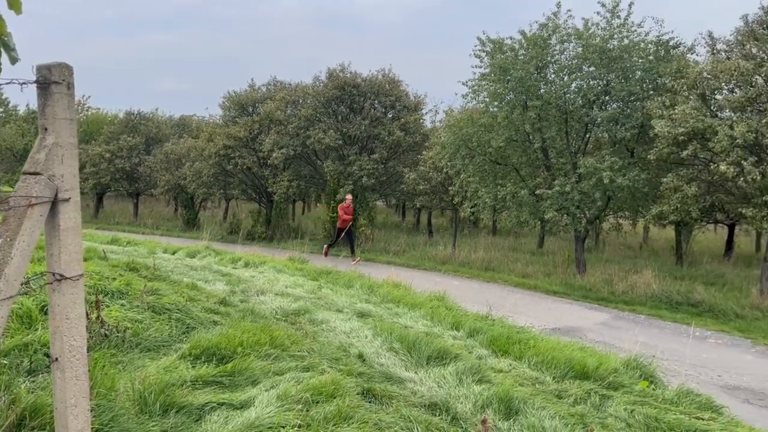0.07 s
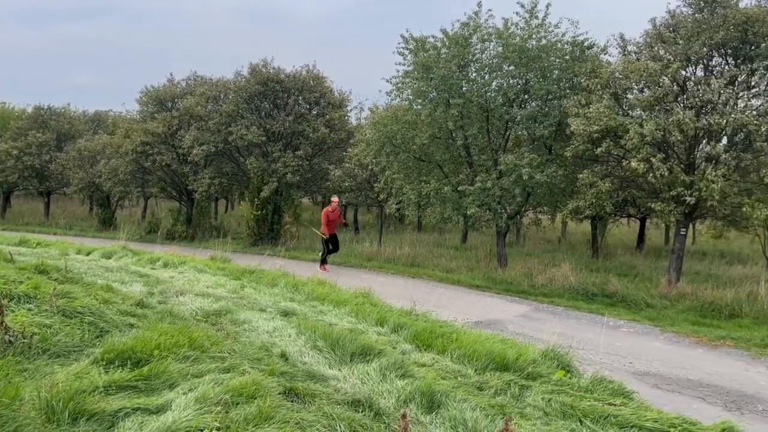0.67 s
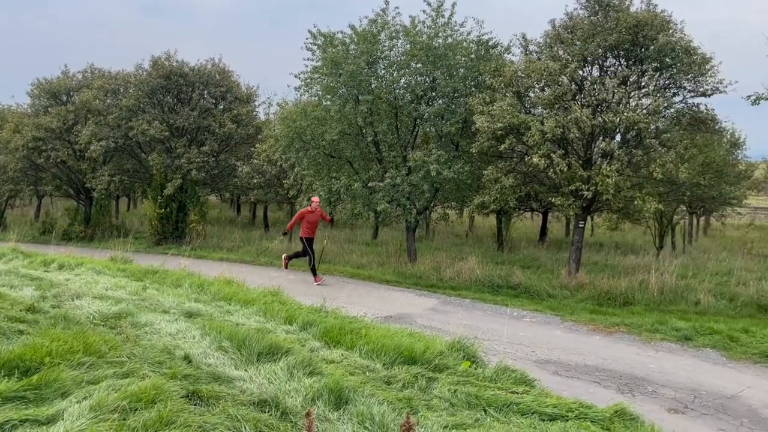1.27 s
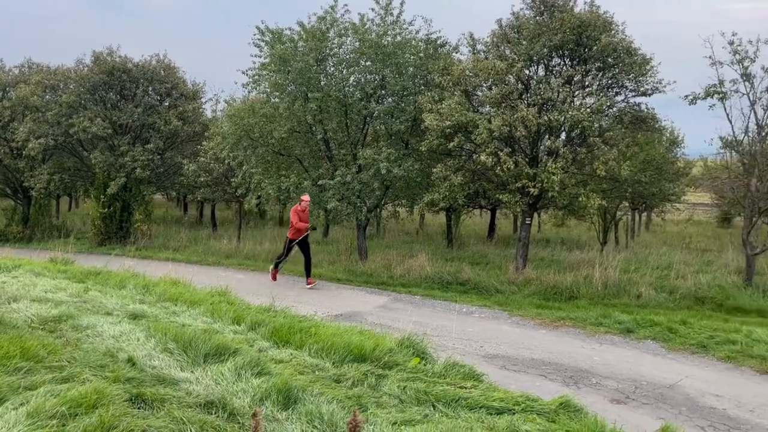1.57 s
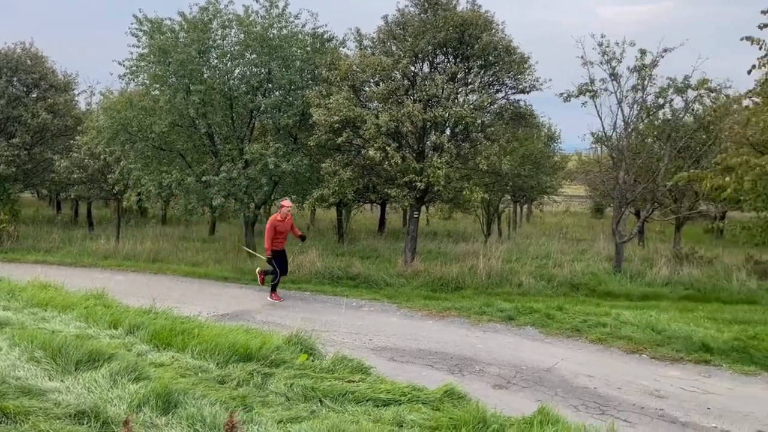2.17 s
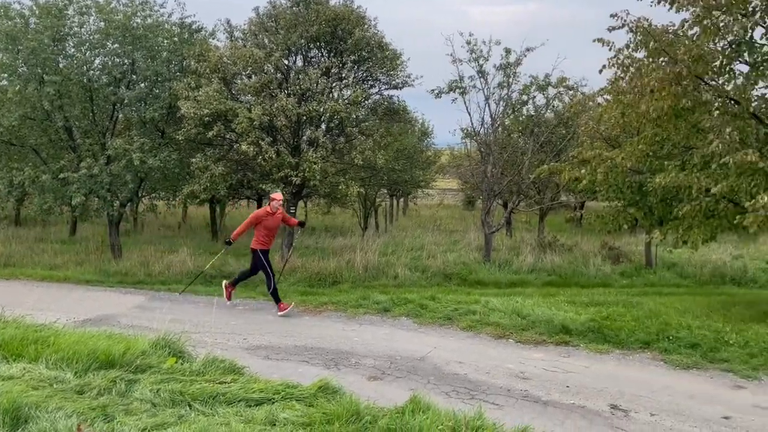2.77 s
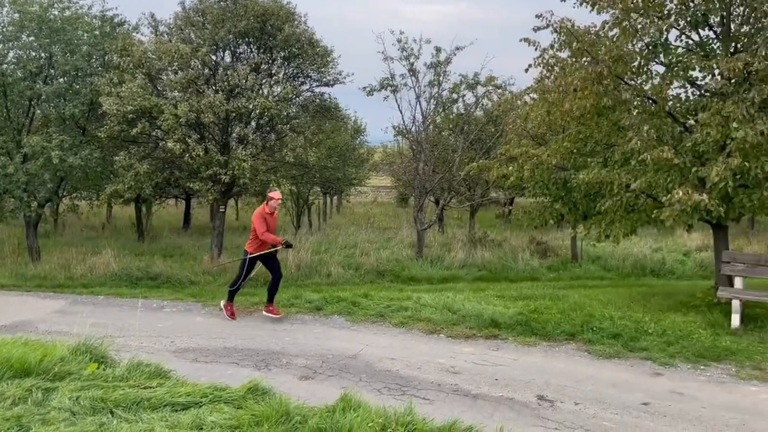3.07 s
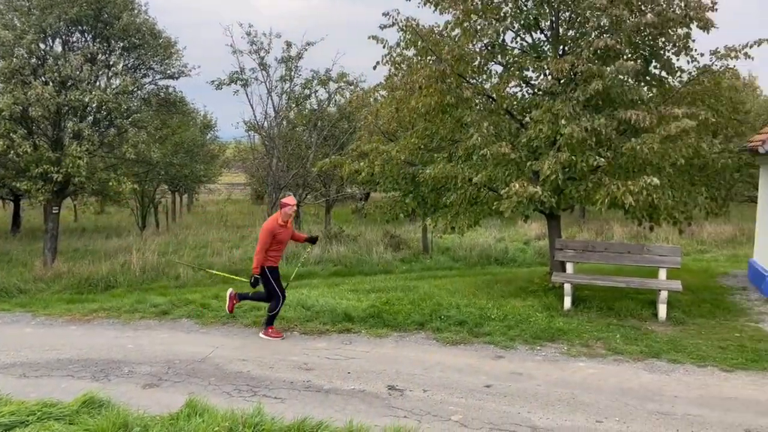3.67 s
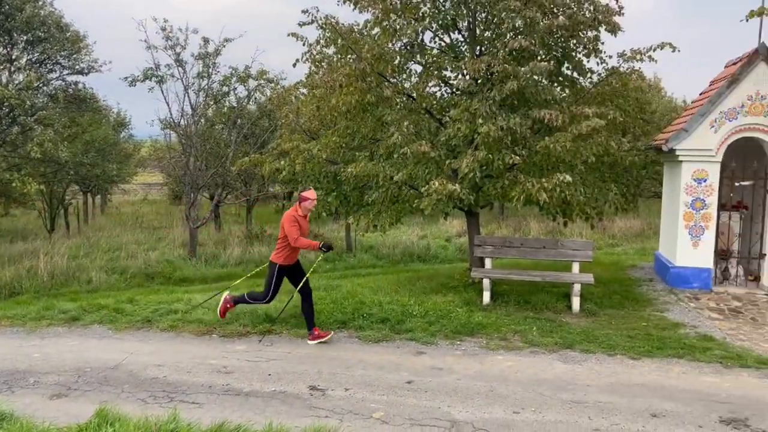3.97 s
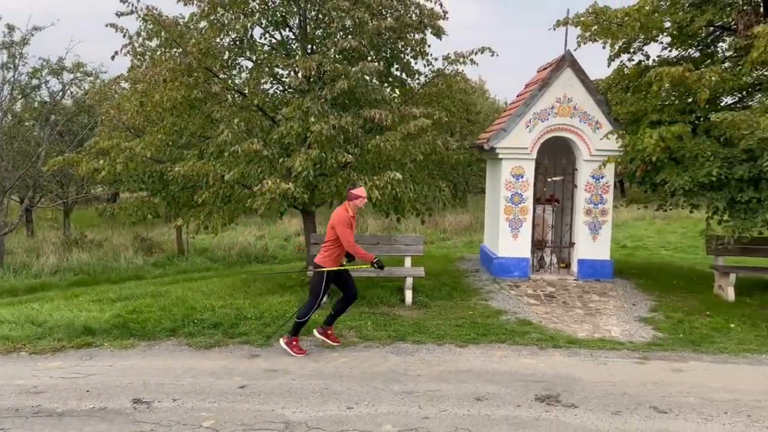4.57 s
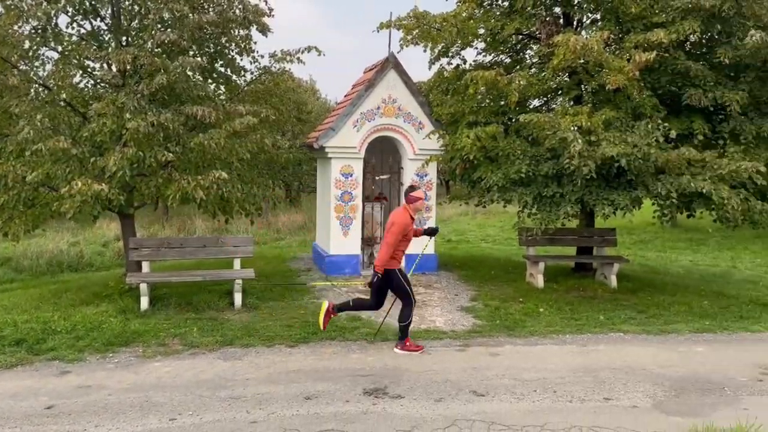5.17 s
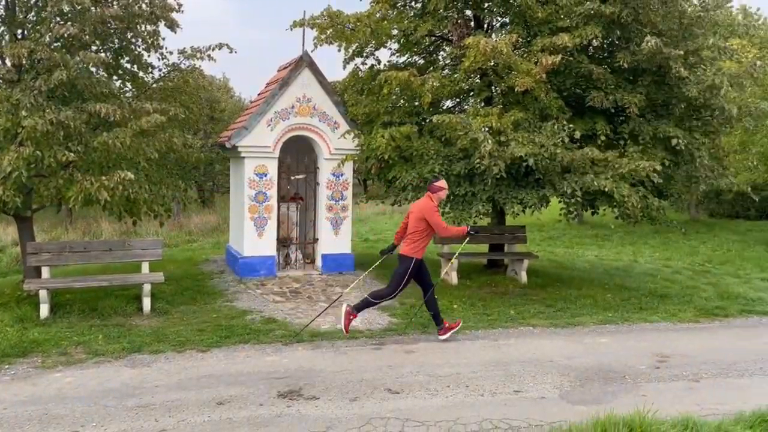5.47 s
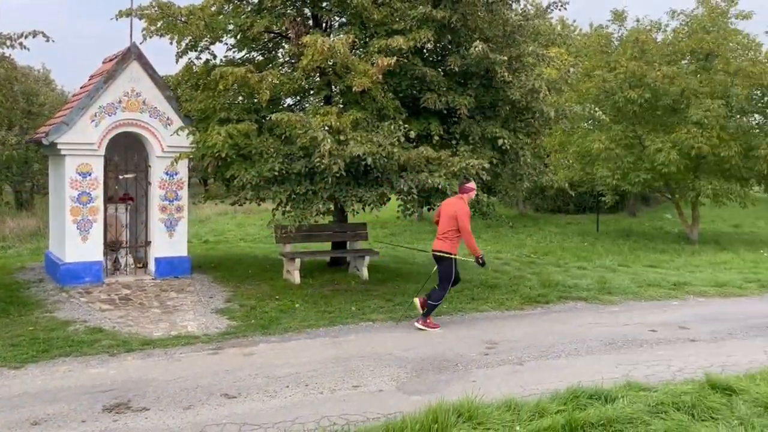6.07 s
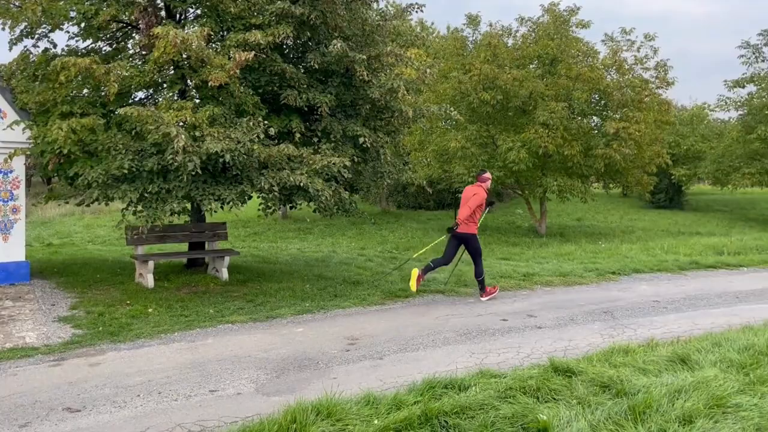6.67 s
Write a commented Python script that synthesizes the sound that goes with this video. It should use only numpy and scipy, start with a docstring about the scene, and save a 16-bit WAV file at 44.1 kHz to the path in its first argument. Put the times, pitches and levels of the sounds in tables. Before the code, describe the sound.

Sharp clacks of walking pole tips and soft, gritty footsteps as a runner approaches and passes on an outdoor path, with light wind.

```python
"""An orchard path of gritty asphalt: a faint far hum, rustling leaves, a little wind on the microphone.
A runner with two metal-tipped poles bounds in from a distance, near the middle of the stereo image.
Each stride is a soft heel, the clack of a pole tip scattered back by the trees, then grit under the shoe.
The runner is closest and the poles loudest at about 4 s. After that the shoes crunch over looser grit,
the clacks weaken and the breeze freshens."""
import sys
import numpy as np
from scipy import signal
from scipy.fft import rfft, irfft, next_fast_len
from scipy.io import wavfile
from scipy.ndimage import uniform_filter1d

SR = 44100
rng = np.random.default_rng(int(sys.argv[2]) if len(sys.argv) > 2 else 0)


def to_wav(sig):
    """Store sig (one row per channel, or 1-D mono) as 16-bit WAV at the path in sys.argv[1].

    Samples outside -1..1 are clipped; the rate is SR.
    """
    pcm = np.clip(np.atleast_2d(sig), -1, 1) * 32767
    pcm = np.round(pcm).astype(np.int16)
    wavfile.write(sys.argv[1], SR, pcm.T)  # frames by channels


N = 305613
HIT_S = .01  # an impact's level is its energy spread over this time


def undb(db):
    """Decibels to gain."""
    return 10 ** (np.asarray(db) / 20)


def level(x, db, seconds):
    """Scale a sound so that its energy, spread over the given time, has this rms level."""
    return x * undb(db) / np.sqrt(np.mean(np.sum(x ** 2, -1)) / (seconds * SR))


def curve(rows, t):
    """The columns of a table at the times t."""
    times, *columns = np.transpose(rows)
    return [np.interp(t, times, column) for column in columns]


def band(x, low_hz, high_hz, order=3):
    """Causal band-pass."""
    return signal.sosfilt(signal.butter(order, [low_hz, high_hz], "band", fs=SR, output="sos"), x)


def colour(x, points):
    """Filter a sound by a curve of (freq_hz, gain_db) points."""
    hz, db = np.transpose(points)
    size = next_fast_len(x.shape[-1])
    freqs = np.maximum(np.fft.rfftfreq(size, 1 / SR), 1)
    gain = undb(np.interp(np.log(freqs), np.log(hz), db))
    return irfft(rfft(x, size) * gain, size)[..., :x.shape[-1]]


def noise(count, width):
    """Stereo noise; width is the size of the side against the middle."""
    mid, side = rng.standard_normal((2, count))
    return np.array([mid + width * side, mid - width * side])


def grains(count, per_s, spread_db, width):
    """Tiny cracks of unequal size at random moments."""
    sizes = undb(spread_db * np.minimum(rng.exponential(size=count), 4))
    return noise(count, width) * sizes * (rng.random(count) < per_s / SR)


def wander(per_s):
    """A smooth random drift around zero."""
    hold = int(SR / per_s)
    held = np.repeat(rng.standard_normal(N // hold + 1), hold)
    return uniform_filter1d(uniform_filter1d(held, hold), hold)[:N]


def add(track, start_s, sound):
    """Mix a sound into a track."""
    i = int(start_s * SR)
    start, end = max(i, 0), min(i + sound.shape[-1], N)
    if end > start:
        track[:, start:end] += sound[..., start - i:end - i]


# The runner's bearing from the microphones: time_s, left_over_right_db, left_lead_samples
BEARING = [(0, -1, 0.66), (2.4, 0.8, 1.23), (4.1, 0.1, 2.69), (4.7, 0, 1.35), (6.9, -2.6, 0.46)]


def place(x, time_s):
    """Place a sound at the runner by small gaps in level and arrival time between the microphones."""
    pan_db, lead = curve(BEARING, time_s)
    sides = np.array([[.5], [-.5]])
    shift = np.exp(2j * np.pi * np.fft.rfftfreq(x.shape[-1]) * lead * sides)
    return irfft(rfft(x) * shift, x.shape[-1]) * undb(pan_db * sides)


# Spectra of the far hum, the leaves and the wind on the microphone: freq_hz, gain_db
HUM_SPECTRUM = [(45, -19.5), (72, -11), (99, 6.5), (112, -8), (140, -10.5), (220, -17), (500, -78.5)]
LEAF_SPECTRUM = [(60, -18), (160, 2.5), (250, -0.5), (450, -5.5), (800, -10.5), (1500, -16.5), (2800, -20),
                 (4600, -26.5), (6000, -29.5), (7400, -33), (11300, -31), (16000, -53.5)]
WIND_SPECTRUM = [(12, -19), (28, -13.5), (48, 7), (70, 5), (110, -16.5), (250, -26), (800, -60)]
# The freshening breeze: time_s, leaf_gain_db, rumble_db
BREEZE = [(0, -1, -73), (.9, -3.5, -76), (3.2, -1.5, -70), (4.3, -.5, -66.5), (5.6, .5, -66.5),
          (6.9, 4.5, -57)]
# The strongest puffs on the microphone: centre_s, rumble_db
PUFFS = [(3.522, -59), (4.173, -47.5), (4.658, -49), (4.945, -56.5), (5.072, -54), (5.206, -53.5),
         (5.975, -49), (6.423, -45), (6.591, -43), (6.793, -45.5)]


def orchard_air(hum_db=-64, waver_db=.5, leaves_db=-73, flutter_db=4, buffet_db=4, puff_s=.044):
    """Wind buffets the microphone over a far low hum and softly stirring leaves."""
    t = np.arange(N) / SR
    breeze_db, rumble_db = curve(BREEZE, t)
    puffs = sum(undb(db) * np.exp(-((t - centre_s) / puff_s) ** 2) for centre_s, db in PUFFS)
    wind = undb(rumble_db + buffet_db * wander(per_s=7.2)) + puffs
    rumble = level(colour(noise(N, width=.092), WIND_SPECTRUM), 0, N / SR) * wind
    hum = level(colour(noise(N, width=.34), HUM_SPECTRUM), hum_db, N / SR)
    hum *= undb(waver_db * wander(per_s=1.8))
    leaves = level(colour(noise(N, width=.39), LEAF_SPECTRUM), leaves_db, N / SR)
    leaves *= undb(breeze_db + flutter_db * wander(per_s=33))
    return rumble + hum + leaves


# Small stones on the path, under a shoe or a tip: start_s, relative_db, pitch_hz
STONE_SNAPS = [(.2022, -41, 1940), (1.5396, -50, 1310), (2.1257, -38, 1980), (3.2432, -40, 2710),
               (3.8545, -60.5, 2800), (4.0138, -43, 2260), (4.0535, -36, 2240), (4.2377, -51, 3150),
               (4.6331, -47, 2027), (4.923, -51, 1600), (4.9414, -41.5, 1480), (4.991, -55, 3540),
               (5.2074, -47, 1980), (5.342, -60, 2000), (5.606, -48, 1720), (5.7448, -46, 1900),
               (5.7502, -45, 1510), (5.788, -43.5, 1380), (5.7972, -44, 1000), (5.9203, -62, 1180),
               (5.953, -39, 1250), (5.9562, -37, 4480), (6.185, -61.5, 2570), (6.522, -60, 1660)]


def stones(rise_s=.000089, ring_s=.0018, crack_s=.0028, pop_db=-1, crack_db=-7):
    """A stone snaps out from under the load: a crack and a few cycles of pitch."""
    out, t = np.zeros((2, N)), np.arange(SR // 20) / SR
    for start_s, db, pitch_hz in STONE_SNAPS:
        pop = np.sin(2 * np.pi * pitch_hz * t) * (1 - np.exp(-t / rise_s)) * np.exp(-t / ring_s)
        crack = band(noise(len(t), width=1) * np.exp(-t / crack_s), 650, 4070)
        snap = level(pop, db + pop_db, HIT_S) + level(crack, db + crack_db, HIT_S)
        add(out, start_s, place(snap, start_s))
    return out


# Strides along the path, with relative levels at the microphone: start_s, heel_db, crunch_db, hiss_db
STRIDES = [(-.196, -62, -80, -76.5), (.178, -59, -68, -75), (0.564, -61.5, -74, -95),
           (.942, -53.5, -75.5, -94), (1.314, -59, -69, -84), (1.691, -58.5, -66, -76),
           (2.09, -55.5, -64, -65), (2.471, -52.5, -72.5, -82), (2.847, -53, -69, -84),
           (3.231, -53, -60, -71.5), (3.597, -53, -59, -71.5), (3.987, -48, -56, -56.5),
           (4.382, -56, -53.5, -73.5), (4.763, -46.5, -58, -66.5), (5.149, -52, -60, -66),
           (5.554, -51.5, -54.5, -57.5), (5.922, -56, -62.5, -77.5), (6.32, -54.5, -55.5, -65.5),
           (6.706, -58.5, -66.5, -84)]
# Spectra of the heel's thump and the sole's slap: freq_hz, gain_db
THUMP_SPECTRUM = [(50, -5), (130, 9), (300, 6), (600, 0), (1000, -16), (2500, -32), (8000, -54)]
SLAP_SPECTRUM = [(300, -13.5), (750, 6), (1300, 1), (2800, -6.5), (3700, -18), (8000, -32.5), (16000, -56)]


def heels(rise_s=.0015, thump_s=.034, slap_s=.0091, roll_s=.02, sole=.57, thump_db=7, slap_db=3.5):
    """A cushioned heel thumps on grit and the sole slaps down just after it."""
    out, t = np.zeros((2, N)), np.arange(SR // 5) / SR
    rise = 1 - np.exp(-t / rise_s)
    contact = rise * np.exp(-t / slap_s) + sole * (t > roll_s) * np.exp(-abs(t - roll_s) / slap_s)
    for start_s, heel_db, _, _ in STRIDES:
        thump = colour(noise(len(t), width=.31), THUMP_SPECTRUM) * rise * np.exp(-t / thump_s)
        slap = colour(grains(len(t), per_s=3000, spread_db=3.2, width=.35), SLAP_SPECTRUM) * contact
        step = level(thump, heel_db + thump_db, HIT_S) + level(slap, heel_db + slap_db, HIT_S)
        add(out, start_s, place(step, start_s))
    return out


# Loose grit on the path under the runner: time_s, loose_fraction
LOOSE_GRIT = [(4.3, 0.04), (4.75, 1), (5.6, 0.98), (5.95, 0.21), (6.35, .6), (6.75, 0.59)]
# Heel slide, sole grind and forefoot roll, against the push-off: delay_s, length_s, crunch_db, hiss_db
FOOT_ROLL = [(.045, .055, 5.5, -6.5), (.11, .11, -11, -21), (.19, .06, -1, -11.5)]


def foot_moves():
    """Each stride ends in a push-off; on loose grit it is sooner, longer and follows a crunching roll."""
    for start_s, _, crunch_db, hiss_db in STRIDES:
        loose, = curve(LOOSE_GRIT, start_s)
        push_delay_s = np.interp(loose, [0, 1], [.256, .238])
        push_length_s = np.interp(loose, [0, 1], [.023, .055])
        yield start_s + push_delay_s, push_length_s, crunch_db, hiss_db
        if loose > 0:
            loose_db = 20 * np.log10(loose)
            for delay_s, length_s, roll_crunch_db, roll_hiss_db in FOOT_ROLL:
                yield (start_s + delay_s, length_s,
                       crunch_db + roll_crunch_db + loose_db, hiss_db + roll_hiss_db + loose_db)


# Spectra of sand crunching and hissing under a shoe: freq_hz, gain_db
CRUNCH_SPECTRUM = [(150, 9), (500, 3.5), (1000, 4), (1700, 3), (3000, -16), (4500, -17), (8000, -53),
                   (16000, -20)]
HISS_SPECTRUM = [(1500, -11), (4200, 2.5), (6000, -9.5), (7600, -6), (10500, -10), (13000, -15),
                 (16000, -31)]
# Narrow bands of coarse pebbles rolling against each other: low_hz
PEBBLE_BANDS = [1110, 1620, 2050, 2660]


def scuffs(rise=.28, fall=.37, sand_db=-2, pebble_db=-3.5, hiss_gain_db=3.5):
    """Sand crunches and pebbles click as a shoe rolls or pushes off, swelling and dying away."""
    out = np.zeros((2, N))
    for start_s, length_s, crunch_db, hiss_db in foot_moves():
        t = np.arange(-2 * length_s, 2 * length_s, 1 / SR)
        swell = 1 / (np.exp(-t / (rise * length_s)) + np.exp(t / (fall * length_s)))
        sand = colour(grains(len(t), per_s=1800, spread_db=3, width=.3) * swell, CRUNCH_SPECTRUM)
        pebbles = 0
        for low_hz in PEBBLE_BANDS:
            clicks = grains(len(t), per_s=160, spread_db=2.2, width=.36) * swell
            pebbles += band(clicks, low_hz, low_hz * 1.11, order=1)
        hiss = colour(grains(len(t), per_s=2900, spread_db=2.2, width=.89) * swell, HISS_SPECTRUM)
        scuff = level(sand, crunch_db + sand_db, length_s)
        scuff += level(band(pebbles, 600, 3200), crunch_db + pebble_db, length_s)
        scuff += level(hiss, hiss_db + hiss_gain_db, length_s)
        add(out, start_s + t[0], scuff)
    return out


# From runner to microphone, setting the far trees' share of the echo: time_s, distance_m
RUNNER_DISTANCE = [(0, 26), (2, 20), (4.2, 8.3), (5.3, 20), (6.9, 13)]
# Spectra of the echo from the trees: freq_hz, gain_db
ECHO_BODY = [(100, -0.5), (300, 4), (700, 0.5), (1500, 7.5), (2900, 1.5), (3700, -25.5), (6000, -39.5)]
ECHO_TREBLE = [(1500, -50), (2700, -14.5), (3400, -1.5), (5200, -4), (6100, -9), (7600, -4.5), (9000, -12),
               (11000, -16), (13000, -25.5), (16000, -27)]


def tree_echo(rise_s=.0039, near_s=.023, far_s=.084, far_db=-19, reference_m=13, recede_db=4,
              body_db=8, treble_db=11, tilt=.22):
    """Verge and near trees scatter each clack back at once; the far orchard answers faintly for longer."""
    out, t = np.zeros((2, N)), np.arange(16384) / SR
    for start_s, _, bright_db, _, echo_db in POLE_STRIKES:
        distance_m, = curve(RUNNER_DISTANCE, start_s)
        far_gain = undb(far_db + recede_db * np.log(distance_m / reference_m))
        fade = (1 - np.exp(-t / rise_s)) * (np.exp(-t / near_s) + far_gain * np.exp(-t / far_s))
        scatter = grains(len(t), per_s=9000, spread_db=2.4, width=.83)
        # paths of slightly different length interfere, so each echo has its own uneven colour
        lags = rng.integers(30, 260, size=3)
        scatter += .4 * sum(np.roll(scatter, lag, axis=1) for lag in lags)
        tilt_db = tilt * bright_db
        for spectrum, db in ((ECHO_BODY, body_db - tilt_db), (ECHO_TREBLE, treble_db + tilt_db)):
            add(out, start_s, level(colour(scatter, spectrum) * fade, echo_db + db, HIT_S))
    return out


# Modes of a pole, the tip's short, the shaft's faint but longer: pitch_hz, level_db, t60_s
POLE_MODES = [(1260, -1, 0.0061), (2020, 2, 0.014), (2410, -3, 0.018), (2930, -4, .03), (3130, -14, 0.013),
              (3500, -10, 0.021), (4870, 2.5, 0.016), (5260, 7, .02), (7310, 4, 0.014), (9860, -6.5, 0.026),
              (1640, -26.5, 0.22), (2080, -28.5, 0.15), (2360, -25, .08), (2420, -26, .15),
              (4850, -21.5, .13)]


def pole_ring(t, detune=.011):
    """Each landing meets the ground at its own angle and wakes the pole's modes differently."""
    ring = np.zeros(len(t))
    for pitch_hz, db, t60_s in POLE_MODES:
        weight, drift = rng.standard_normal(2)
        tone = np.sin(2 * np.pi * pitch_hz * (1 + detune * drift) * t)
        ring += undb(db) * weight * tone * np.exp(-np.log(1000) * t / t60_s)
    return ring


# Knock, clack and tick of a tip; hard blows favour the clack, bright ones trade knock for tick:
# low_hz, high_hz, relative_db, db_per_strength_db, db_per_bright_db
TIP_BANDS = [(1050, 2005, -41.5, 1, -1.5), (2230, 4160, -39.5, 1.39, 0), (6223, 10610, -44, 1, 1.5)]
# Tips landing and skipping on the path, with relative levels at the microphone:
# start_s, strength_db, bright_db, thud_db, echo_db
POLE_STRIKES = [(.2009, -5, 2, -60, -62.5), (0.5919, 3, -2.5, -65, -50), (0.5993, -8.5, 4, -55, -58),
                (.961, 3, -1.5, -55.5, -50.5), (1.3559, 0.5, -3.5, -48.5, -53.5),
                (1.539, -20.5, -2, -74, -66.5), (1.658, -25, 4, -82, -75), (1.7328, 1.5, 4, -50, -55.5),
                (1.753, -13.5, 7, -75.5, -62.5), (2.126, 4, -3, -43.5, -50.5),
                (2.1764, -4, 5.5, -47.5, -58), (2.1894, -1.5, 3, -50.5, -56),
                (2.4854, -1.5, 1, -46.5, -57.5), (2.8704, -3, 0.5, -56.5, -56.5),
                (2.883, -7.5, 0.5, -57, -69), (3.171, -35.5, 12.5, -88, -87),
                (3.2428, 5.5, 3.5, -46.5, -49.5), (3.6119, -14, -5, -60, -76.5), (3.643, 0, -0.5, -48, -60),
                (4.0133, 11.5, 3.5, -59, -47.5), (4.0321, 7, 3.5, -68, -45.5),
                (4.0457, 7.5, 3.5, -50.5, -50), (4.0538, 11, 3, -60, -48), (4.4117, -0.5, 9.5, -52, -53.5),
                (4.4215, -2, 6, -52, -66), (4.7701, -8.5, 1, -44.5, -65), (4.7794, -2, 5, -53.5, -58),
                (4.7818, -6, -3, -41, -61), (5.16, -1.5, 1.5, -44.5, -54), (5.5455, 0, -1, -51.5, -54.5),
                (5.9543, -9.5, 5, -55, -55.5), (6.345, 0, -1, -45, -52.5), (6.349, 0.5, -2.5, -54.5, -64),
                (6.752, -13, -3.5, -52, -67.5)]


def pole_tips(bite_s=.0017, crush_s=.0031, crush=.28, settle_s=.0054, settle=.01, blow=3.23,
              ring=.03, thud_hz=(240, 1110), lead_s=.003, gain_db=1):
    """The tip crushes grit, bottoms out on the asphalt in one hard pulse and rings the shaft."""
    out, t = np.zeros((2, N)), np.arange(8192) / SR
    since_blow = t - lead_s
    bite = np.exp(np.minimum(since_blow, 0) / bite_s)
    grit = crush * np.exp(-abs(since_blow) / crush_s) + settle * np.exp(-abs(since_blow) / settle_s)
    for start_s, strength_db, bright_db, thud_db, _ in POLE_STRIKES:
        force = bite * grit * noise(len(t), width=.36)
        force[:, int(lead_s * SR)] += blow
        hit = force + ring * signal.fftconvolve(force, pole_ring(t)[None])[:, :len(t)]
        strike = level(band(hit, *thud_hz), thud_db, HIT_S)
        for low_hz, high_hz, db, growth, tilt in TIP_BANDS:
            band_db = db + growth * strength_db + tilt * bright_db
            strike += level(band(hit, low_hz, high_hz), band_db, HIT_S)
        add(out, start_s - lead_s, place(strike * undb(gain_db), start_s))
    return out


def scene():
    """Poles, shoes and the open air, heard from beside the path."""
    return pole_tips() + tree_echo() + heels() + scuffs() + stones() + orchard_air()


# Stereo width of the microphone pair: freq_hz, side_gain_db
MIC_WIDTH = [(60, 0), (250, -1.5), (1000, 1.5), (4000, 0), (9000, -9.5), (13000, -7.5)]


def record(dry, top_hz=16200):
    """A closely spaced pair, its image narrower in the high treble; the recorder cuts the top."""
    mid = dry.mean(0)
    side = colour((dry[0] - dry[1]) / 2, MIC_WIDTH)
    low_pass = signal.ellip(8, .2, 70, top_hz, fs=SR, output="sos")
    return signal.sosfilt(low_pass, np.array([mid + side, mid - side]))


dry = scene()
out = record(dry)
to_wav(out)
```